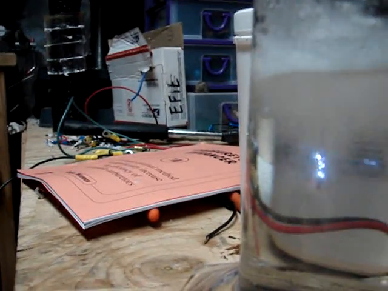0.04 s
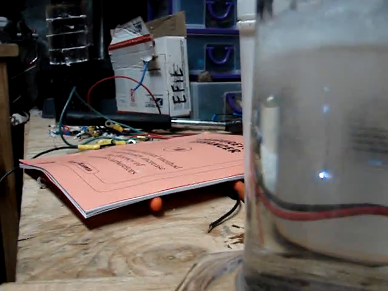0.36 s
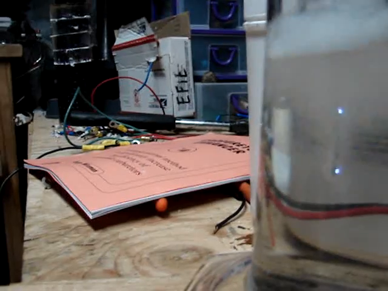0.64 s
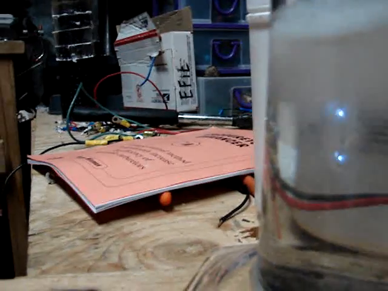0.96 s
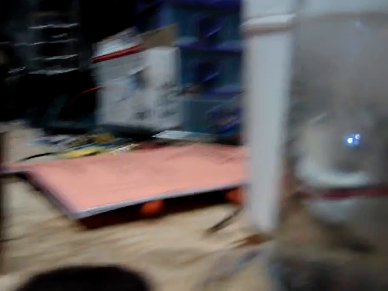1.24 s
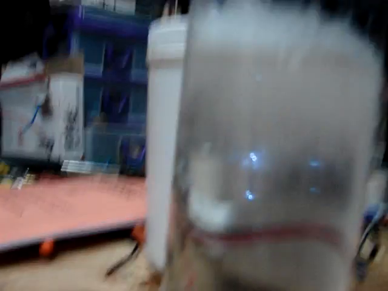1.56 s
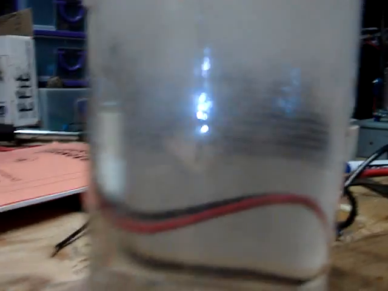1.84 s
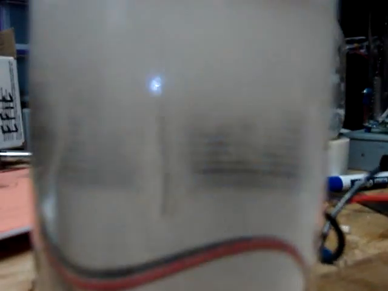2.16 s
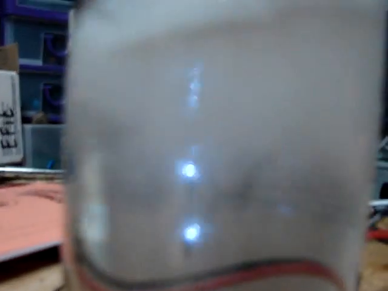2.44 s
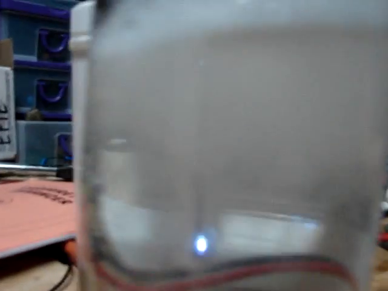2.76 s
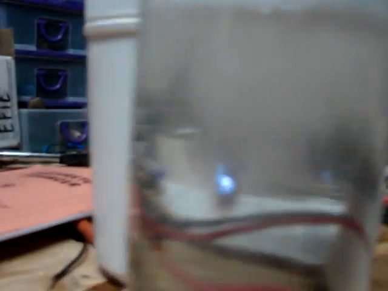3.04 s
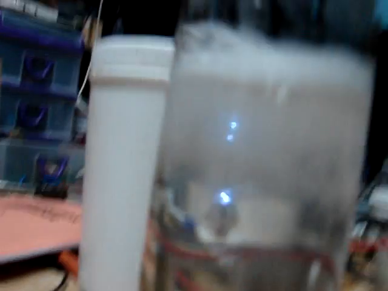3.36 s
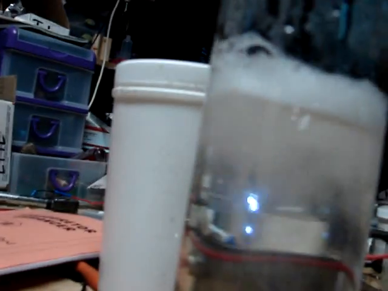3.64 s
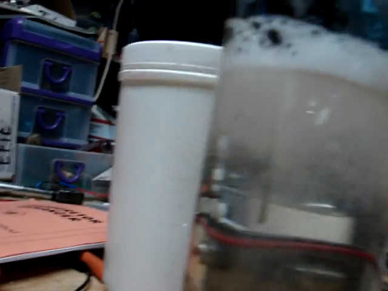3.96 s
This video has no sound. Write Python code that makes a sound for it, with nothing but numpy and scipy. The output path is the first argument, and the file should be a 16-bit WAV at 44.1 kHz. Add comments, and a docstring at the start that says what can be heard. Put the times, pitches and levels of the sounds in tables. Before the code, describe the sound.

Electric sparks crackle rapidly inside a jar of liquid, with sizzling, bubbling and a low electrical hum. At the end a switch clacks and the sparking stops. The sound is close, in a small workshop.

```python
"""Mains-driven sparks crackle in a jar of frothing liquid on a workbench. From the start, over the
hum of the supply, an arc strikes every half-cycle, hard on one polarity and weak on the other: it
cracks in the jar's resonances and sizzles, and its vapour bubble thumps the liquid column. Small
bubbles burst in its wake, and the heaviest arcs knock the bench. Near halfway one large bubble hoots.
At 3.9 s the current stops and a switch clacks, ringing briefly in the workshop."""
import sys
import numpy as np
from scipy import signal
from scipy.fft import rfft, irfft
from scipy.io import wavfile

SR = 44100
rng = np.random.default_rng(int(sys.argv[2]) if len(sys.argv) > 2 else 0)


def to_wav(s):
    """Save 16-bit WAV."""
    ch = np.atleast_2d(s).T  # columns
    pcm = np.round(np.clip(ch, -1, 1) * 32767)  # PCM
    wavfile.write(sys.argv[1], SR, pcm.astype(np.int16))


N = 176400
TIME = np.arange(N) / SR
MAINS_HZ, OFF_S = 60, 3.892
CAVITY_HZ, CRACK_S, SIZZLE_S = 2000, 0.00095, 0.0016   # usual cavity pitch; forward-burst half-lengths

# the loudest arcs: (time [s], crack level [dB], sizzle level [dB], cavity pitch [Hz])
LOUD_ARCS = [(0.203, -17, -33, 2100), (0.218, -22.5, -45, 2650), (0.3688, -22.5, -36, 2350),
             (0.453, -20.5, -41.5, 2550), (0.5848, -16, -41, 2000), (0.6187, -17.5, -39, 1730),
             (0.72, -19, -43.5, 2530), (0.836, -17, -48, 1900), (0.853, -18, -41, 2580),
             (1.0368, -18.5, -44.5, 2780), (1.0703, -21.5, -36, 2630), (1.103, -16.5, -41, 1740),
             (1.1192, -16, -41.5, 2750), (1.1367, -21.5, -49.5, 2350), (1.2033, -17.5, -42.5, 1900),
             (1.237, -20, -51, 1830), (1.319, -18.5, -52, 1970), (1.3534, -17.5, -43.5, 1660),
             (1.3698, -19.5, -46, 1690), (1.4531, -18, -43.5, 1730), (1.502, -21.5, -28.5, 2450),
             (1.5188, -27, -34.5, 2250), (1.535, -21.5, -22, 2980), (1.603, -24, -45, 1690),
             (1.768, -16.5, -27, 2180), (1.8197, -16.5, -39, 1760), (1.837, -19, -26.5, 2050),
             (1.8532, -18.5, -35.5, 1790), (1.8693, -19.5, -26, 1920), (1.8872, -21.5, -37.5, 2270),
             (1.919, -15, -27, 2960), (1.9359, -16.5, -31.5, 2020), (2.1195, -21.5, -51.5, 2300),
             (2.153, -17.5, -46, 1640), (2.1854, -15, -44.5, 2330), (2.2361, -22.5, -39, 1920),
             (2.42, -17.5, -39.5, 1670), (2.4361, -23, -36, 2090), (2.536, -18, -29, 2500),
             (2.7193, -19.5, -52, 2550), (2.8025, -19, -45.5, 2300), (2.8362, -23, -39, 1800),
             (2.8699, -18.5, -38.5, 2240), (2.9122, -20.5, -41.5, 2060), (2.9532, -21, -53.5, 2480),
             (2.971, -21, -44, 1470), (3.053, -20.5, -39.5, 2660), (3.0871, -17.5, -42.5, 2850),
             (3.136, -20.5, -45.5, 2000), (3.1534, -19.5, -50, 1950), (3.17, -14.5, -30, 1920),
             (3.254, -20.5, -45, 2180), (3.32, -21.5, -36, 2030), (3.7541, -21.5, -39, 2330)]
# cycles in which the forward arc barely strikes: (time [s])
MISFIRE_TIMES = [0.153, 0.186, 0.253, 0.47, 0.57, 0.686, 0.82, 0.886, 0.986, 1.186, 1.303, 1.336, 1.47,
                 1.57, 1.586, 1.736, 1.97, 2.22, 2.32, 2.52, 2.57, 2.67, 2.703, 2.786, 2.82, 2.886, 3.02,
                 3.036, 3.07, 3.303, 3.553, 3.77, 3.886]
# sizzle of the ordinary arcs: (time [s], gain [dB])
SIZZLE_TREND = [(.15, -1), (.9, -1), (2.7, -2.5), (3.5, -2), (3.8, -2.5)]
def arcs():
    """Breakdown, twice a cycle. Rows: time, crack dB, sizzle dB, cavity Hz, thump dB, length factor."""
    cycles = np.arange(int(OFF_S * MAINS_HZ) + 1) / MAINS_HZ + .0032
    trend_db = contour(cycles, SIZZLE_TREND)

    def polarity(delay_s, stretch, crack_db, sizzle_db, thump_db, spread_db):
        late, force, bright, size, pitch = scatter((len(cycles), 5)).T
        return np.array([cycles + delay_s + .0008 * late,
                         crack_db + spread_db * force,
                         sizzle_db + trend_db + spread_db * (.5 * force + 1.4 * bright),
                         CAVITY_HZ * 2 ** (0.29 * pitch),
                         thump_db + spread_db * .5 * size,
                         np.full(len(cycles), stretch)])

    forward = polarity(0, stretch=1, crack_db=-29.5, sizzle_db=-47, thump_db=14.5, spread_db=4.5)
    reverse = polarity(.0075, stretch=2.05, crack_db=-37.5, sizzle_db=-57.5, thump_db=1.5, spread_db=7)
    levels = slice(1, 3)   # crack and sizzle
    for time in MISFIRE_TIMES:
        forward[levels, np.argmin(abs(cycles - time))] -= 25
    # a reverse arc inherits a share of the forward arc's strength
    reverse[levels] += 0.15 * (forward[levels] - forward[levels].mean(axis=1, keepdims=True))
    both = np.hstack([forward, reverse])
    for loud in LOUD_ARCS:
        both[:len(loud), np.argmin(abs(both[0] - loud[0]))] = loud
    return both[:, both[0] < OFF_S]


def collapses(times, db, half_s, body):
    """Cavitation: each arc is a flurry of collapses filtered by a body; db is its level over 6 ms."""
    t = np.arange(-.007, .025, 1 / SR)
    trail = from_db(-18.5) * np.exp(-abs(t) / 0.0067) * (t > 0)
    envelope = np.exp(-.5 * (t / half_s[:, None]) ** 2) + trail
    sizes = from_db(4.5 * np.minimum(rng.exponential(1, envelope.shape), 6))
    sound = body(rng.standard_normal(envelope.shape) * sizes * envelope)
    sound = sound / np.sqrt(np.sum(sound ** 2, axis=1, keepdims=True) / (.006 * SR))
    return place(times + t[0], db, sound)


# resonances of the jar: (frequency [Hz], bandwidth [Hz], gain [dB])
JAR_MODES = [(920, 160, -6), (1694, 350, 3.5), (2050, 270, -9.5), (2614, 330, 0), (2960, 110, -13.5)]
def jar(flurry, cavity_hz):
    """Modal response: each strike spot weights the modes anew; a small cavity favours the upper ones."""
    upper = np.tanh(2 * np.log2(np.array(JAR_MODES)[:, 0] / CAVITY_HZ)) / 2
    tilt_db = 28 * np.outer(np.log2(cavity_hz / CAVITY_HZ), upper)
    weights = from_db(tilt_db + 4 * rng.standard_normal(tilt_db.shape))
    rings = sum((-1) ** k * from_db(db) * weights[:, [k]] * resonate(flurry, hz, width)
                for k, (hz, width, db) in enumerate(JAR_MODES))
    return cut(cut(rings, 945, "high"), 3670, "low", order=4)


def cavities(times, db, hz, half_s=0.0011, rise_per_s=66):
    """Bubble resonance: each arc's vapour cavity rings briefly, rising in pitch as it shrinks."""
    t = np.arange(-.006, .006, 1 / SR)
    turns = hz[:, None] * (t + rise_per_s * t * t / 2) + rng.random((len(hz), 1))
    chirps = np.sin(2 * np.pi * turns) * np.exp(-.5 * (t / half_s) ** 2)
    return place(times + t[0], db, rms_one(chirps) / np.sqrt(2))


# spectrum of the sizzle: (frequency [Hz], gain [dB])
SIZZLE_SPECTRUM = [(3600, 1.5), (5100, 4.5), (6200, -1), (7200, -9), (10000, -15.5)]
def sizzle(flurry, band_hz=687, scatter_db=6):
    """Brief pulses radiate broadband: the treble of each arc, with peaks and dips of its own."""
    band = np.fft.rfftfreq(flurry.shape[1], 1 / SR) / band_hz
    bands_db = scatter_db * rng.standard_normal((len(flurry), 64))
    gain = from_db([np.interp(band, np.arange(len(row)), row) for row in bands_db])
    return colour(irfft(rfft(flurry) * gain, flurry.shape[1]), SIZZLE_SPECTRUM)


def glass_wall(flurry):
    """Forced vibration: one mode of the glass rings under every arc."""
    return resonate(flurry, hz=3827, width=117)


# resonances of the liquid column: (frequency [Hz], bandwidth [Hz], gain [dB])
COLUMN_MODES = [(254, 53, -12), (299, 39.2, 2.5), (348.6, 26, -3.5), (490, 91, -15.5), (587, 53.6, -7),
                (661, 39, -9)]
# size of the vapour bubbles: (time [s], level [dB])
VAPOUR_LEVEL = [(0, -23.5), (.45, -24.5), (.75, -29), (1.05, -25), (1.2, -27.5), (1.8, -27.5), (2.3, -31),
                (2.6, -29), (3.2, -28.5), (3.85, -26)]
def thumps(times, db, lead_s=0.00207, jitter_s=0.00037, scatter_db=7):
    """Impulse response: each arc's vapour bubble pushes the liquid column, which rings in its modes."""
    chance = scatter((len(times), len(COLUMN_MODES) + 1))
    starts = times - lead_s + jitter_s * chance[:, -1]
    column = sum(resonate(place(starts, db + mode_db + scatter_db * chance[:, k]), hz, width)
                 for k, (hz, width, mode_db) in enumerate(COLUMN_MODES))
    column = cut(cut(column, 178, "high"), 867, "low", order=4)
    return rms_one(column) * from_db(contour(TIME, VAPOUR_LEVEL) - 0.5)


# bubbles thrown off by the arcs: (lowest pitch [Hz], highest pitch [Hz], rate [1/s],
# ring to -60 dB [cycles], level [dB], exponent on arc strength [-])
LARGE_BUBBLES = (429, 897, 700.5, 6, -42.5, 0.9)
SMALL_BUBBLES = (1547.5, 3000, 801.5, 26, -38.5, 0.54)
FINE_BUBBLES = (4298, 9998.5, 1799, 28.5, -53, 1)
def bubbles(times, arc_db, kind, wake_s=0.005):
    """Damped oscillators: bubbles burst at random and ring, louder in the wake of a strong arc."""
    low_hz, high_hz, per_s, cycles, db, exponent = kind
    wake = signal.lfilter([1], [1, -np.exp(-1 / (wake_s * SR))], place(times, arc_db) + 1e-18)
    bursting = rng.random(N) < per_s / SR
    sizes = from_db(5 * np.minimum(rng.exponential(1, N), 3))
    kicks = bursting * wake ** exponent * sizes * rng.choice([-1, 1], N)
    pitches = np.geomspace(low_hz, high_hz, 20)
    chosen = rng.integers(0, len(pitches), N)
    rings = sum(low_hz / hz * ring(kicks * (chosen == k), hz, cycles / hz)
                for k, hz in enumerate(pitches))
    return from_db(db) * rms_one(cut(rings, [low_hz * 0.75, high_hz * 1.2], "band"))


def gulp(start_s=1.845, hz=301, swell_s=0.029):
    """A large bubble resonates low: one short hoot swells and dies away."""
    age = np.maximum(TIME - start_s, 0)
    envelope = age / swell_s * np.exp(1 - age / swell_s)
    return from_db(-22.5) * envelope * np.sin(2 * np.pi * hz * age)


# blow that rings the switch case: (time [s], level [dB])
SWITCH_BLOW = [(3.9017, -17)]
# modes of the case: (frequency [Hz], relative level [dB], decay to -60 dB [s])
CASE_MODES = [(963, -4, 0.16), (1067, 3, 0.17), (1170, 6, 0.15), (1317, -5, 0.1), (2230, 0.5, 0.095),
              (3940, -5, 0.14), (4500, -9, 0.15), (8780, -8, 0.21), (9600, -10, 0.16)]
# spectrum of its tick and rattle: (frequency [Hz], relative level [dB])
RATTLE_SPECTRUM = [(300, -34), (850, -17.5), (1140, -7), (1510, -11.5), (2590, -11), (3380, -25),
                   (4210, -13.5), (4940, -21), (10000, -29.5), (13000, -62)]
def switch():
    """Impact excitation: a sharp tick, then the case rings in its modes and rattles."""
    times, db = np.transpose(SWITCH_BLOW)
    blow = place(times, db)
    rings = sum((-1) ** k * from_db(mode_db - 8.5) * ring(blow, hz, t60)
                for k, (hz, mode_db, t60) in enumerate(CASE_MODES))
    age = np.maximum(TIME - times[0], 0)
    rattle = from_db(-18) * decay(age, t60=0.23)
    tick = from_db(-20.5) * np.exp(-age / 0.00098)
    return rings + noise(RATTLE_SPECTRUM) * (rattle + tick) * (age > 0)


# blows of the heaviest arcs on the bench: (time [s], level [dB])
BENCH_BLOWS = [(.453, -28), (.586, -31), (1.08, -29), (1.204, -37), (1.536, -33), (1.87, -34), (2.187, -36),
               (3.171, -33), (3.755, -36)]
def bench(hz=42.4):
    """Damped free vibration: the bench top swings dully after each blow."""
    blows = place(*np.transpose(BENCH_BLOWS))
    return cut(ring(blows, hz, t60=0.066), 2 * hz, "low")


# partials of the supply hum: (frequency [Hz], level [dB])
HUM_PARTIALS = [(120, -41.5), (240, -31), (360, -38.5), (600, -47.5)]
# course of the hum: (time [s], gain [dB])
HUM_TREND = [(0, 4.5), (1, 2.5), (1.35, -1), (2.3, -3.5), (3.85, 1)]
def hum(waver_db=1.16, sag_db=-4.5, sag_s=0.017):
    """Even harmonics of the mains waver, and sag when a heavy arc loads the supply."""
    load = sum(np.exp(-.5 * ((TIME - time) / sag_s) ** 2) for time, _ in BENCH_BLOWS)
    gain_db = contour(TIME, HUM_TREND) + sag_db * load
    return sum(np.sqrt(2) * from_db(db + gain_db + waver_db * drift(MAINS_HZ / 2))
               * np.sin(2 * np.pi * hz * TIME) for hz, db in HUM_PARTIALS)


# spectrum of the froth: (frequency [Hz], relative level [dB])
FROTH_SPECTRUM = [(25, -1), (80, -4.5), (160, -2), (300, -20), (900, 4.5), (2500, -4.5), (5000, -45),
                  (10000, -36.5)]
def froth(db):
    """Incoherent sources add up to steady noise: the wash of the frothing liquid."""
    return from_db(db) * noise(FROTH_SPECTRUM)


# spectrum of the reverberation: (frequency [Hz], relative level [dB])
ROOM_SPECTRUM = [(100, 19.5), (300, 6.5), (1500, 1), (4000, -3.5), (10000, -5.5)]
def workshop(x):
    """Diffuse reflection from the bench and the clutter around it gives a short tail."""
    tail = noise(ROOM_SPECTRUM) * decay(TIME, t60=0.12) * (TIME > .003)
    return from_db(-15.5) * signal.fftconvolve(x, tail / np.sqrt(np.sum(tail ** 2)))[:N]


def from_db(db):
    return 10 ** (np.asarray(db) / 20)


def rms_one(x):
    return x / np.sqrt(np.mean(x ** 2) + 1e-20)


def contour(times, table):
    return np.interp(times, *np.transpose(table))


def decay(age, t60):
    return np.exp(-np.log(1000) * age / t60)


def scatter(shape):
    """Uniform chance with unit variance."""
    return rng.uniform(-np.sqrt(3), np.sqrt(3), shape)


def drift(per_s):
    """Slow chance with a spread near 1."""
    return np.interp(TIME * per_s, np.arange(1000), rng.standard_normal(1000))


def colour(x, spectrum):
    """Filter by a spectrum that falls steeply below its first point."""
    hz, db = np.transpose(spectrum)
    f = np.maximum(np.fft.rfftfreq(x.shape[-1], 1 / SR), 1)
    gain = from_db(np.interp(np.log(f), np.log(hz), db)) * np.minimum(f / hz[0], 1) ** 6
    return irfft(rfft(x) * gain, x.shape[-1])


def noise(spectrum):
    return rms_one(colour(rng.standard_normal(N), spectrum))


def resonate(x, hz, width):
    """A second-order resonance with unit peak gain."""
    r, w = np.exp(-np.pi * width / SR), 2 * np.pi * hz / SR
    feedforward = np.array([1, 0, -1]) * (1 - r * r) / 2
    return signal.lfilter(feedforward, [1, -2 * r * np.cos(w), r * r], x + 1e-18)


def ring(x, hz, t60):
    """A damped oscillator: a unit impulse starts a sine of height 1."""
    r, w = decay(1 / SR, t60), 2 * np.pi * hz / SR
    return signal.lfilter([0, np.sin(w)], [1, -2 * r * np.cos(w), r * r], x + 1e-18)


def cut(x, hz, kind, order=2):
    return signal.sosfilt(signal.butter(order, hz, kind, fs=SR, output="sos"), x)


def place(times, db, sounds=1):
    """Lay one short sound (a row; by default an impulse) at each time, with its gain."""
    sounds = sounds * from_db(db)[:, None]
    at = np.round(times * SR).astype(int)[:, None] + np.arange(sounds.shape[1])
    inside = (at >= 0) & (at < N)
    return np.bincount(at[inside], sounds[inside], N)


def scene():
    """Superposition: arcs, liquid, bench and switch sound in the room, over hum and froth."""
    times, crack_db, sizzle_db, cavity_hz, thump_db, stretch = arcs()
    vapour_db = contour(times, VAPOUR_LEVEL)
    excess_db = crack_db - crack_db.mean()
    cracks = collapses(times, crack_db - 2, CRACK_S * stretch, lambda flurry: jar(flurry, cavity_hz))
    cracks += cavities(times, crack_db - 6, cavity_hz)
    sizzles = collapses(times, sizzle_db, SIZZLE_S * stretch, sizzle)
    glass_db = -44 + .5 * excess_db + vapour_db - vapour_db.mean()
    glass = collapses(times, glass_db, CRACK_S * stretch, glass_wall)
    gurgle = bubbles(times, vapour_db + thump_db + 0.66 * excess_db, LARGE_BUBBLES)
    pops = bubbles(times, crack_db, SMALL_BUBBLES)
    fizz = bubbles(times, sizzle_db, FINE_BUBBLES)
    liquid = gurgle + pops + fizz + gulp() + thumps(times, thump_db)
    direct = cracks + sizzles + glass + liquid + bench() + switch()
    powered = np.exp(-np.maximum(TIME - OFF_S, 0) / 0.012)
    background = powered * (hum() + froth(db=-45.5)) + froth(db=-62)
    return (direct + workshop(direct) + background)[None]


def record(dry):
    """A steep low-pass filter removes the treble above 10 kHz."""
    return signal.sosfiltfilt(signal.ellip(10, .1, 60, 10050, fs=SR, output="sos"), dry)


dry = scene()
out = record(dry)
to_wav(out)
```